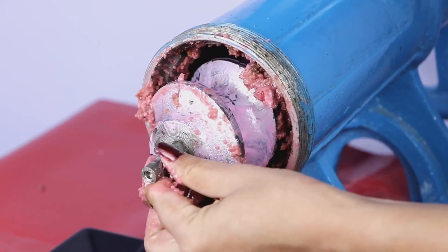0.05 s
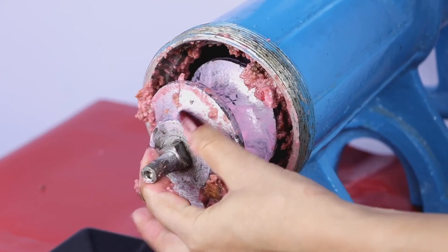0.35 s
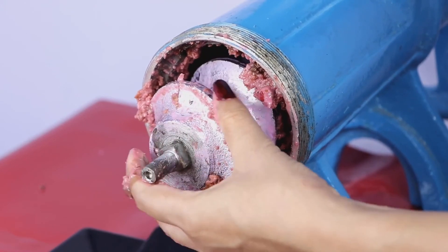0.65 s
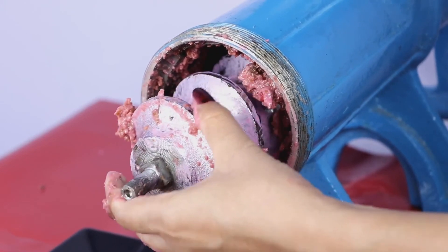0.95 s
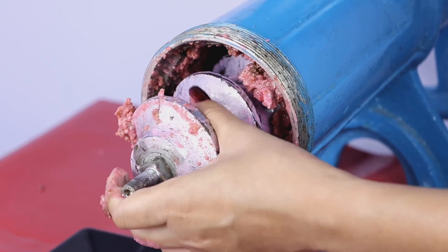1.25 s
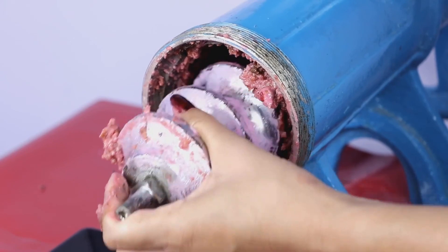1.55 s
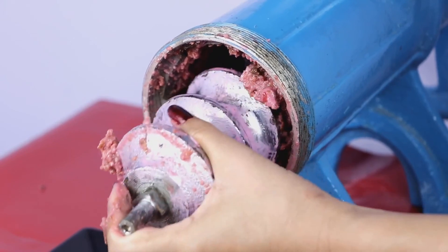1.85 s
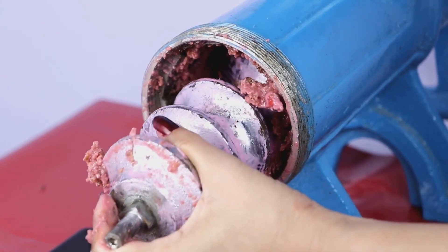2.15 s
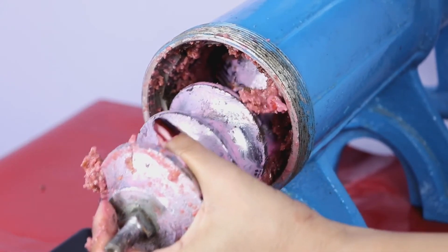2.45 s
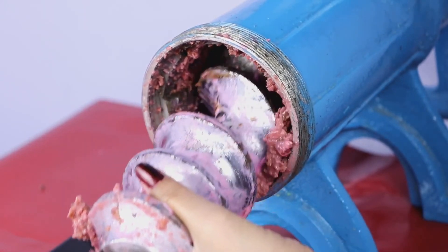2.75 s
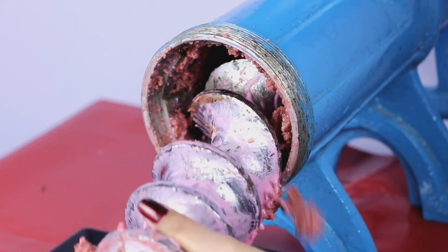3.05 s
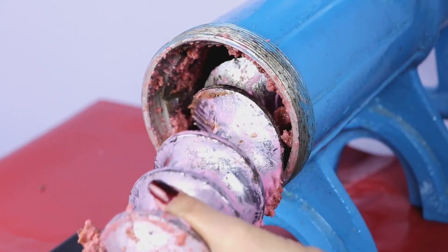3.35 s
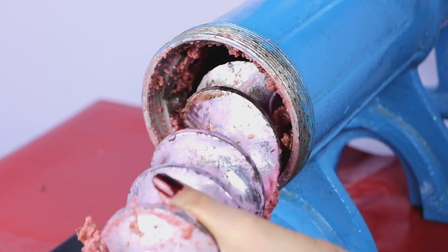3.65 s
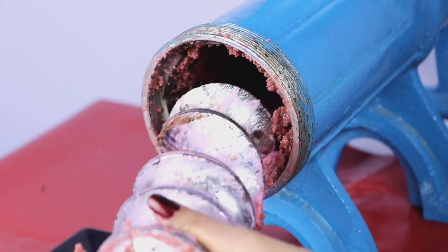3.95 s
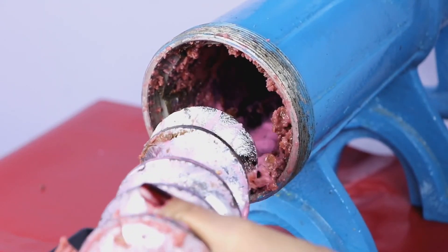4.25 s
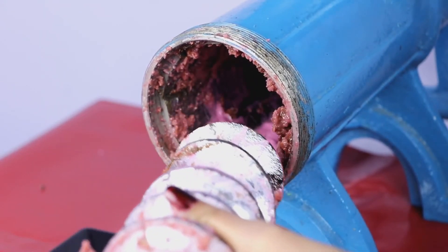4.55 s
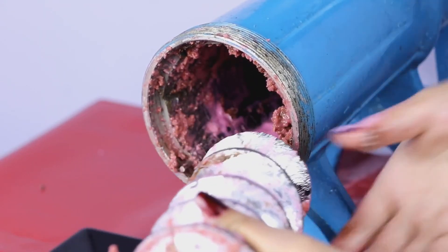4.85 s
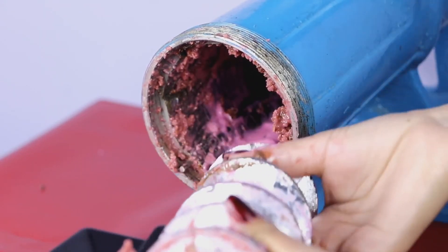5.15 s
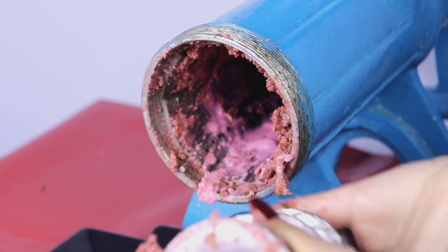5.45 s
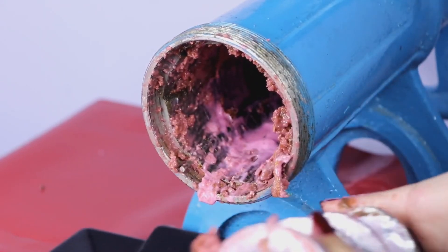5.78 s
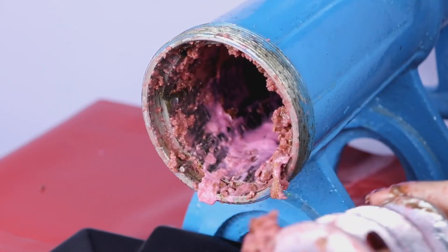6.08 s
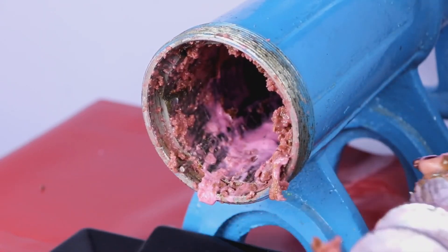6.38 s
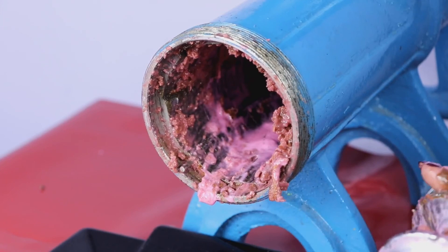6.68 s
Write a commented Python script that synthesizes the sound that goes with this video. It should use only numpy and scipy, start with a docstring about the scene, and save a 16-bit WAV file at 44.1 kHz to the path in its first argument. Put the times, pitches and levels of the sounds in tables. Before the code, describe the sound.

A steel auger is dragged by hand out of a big meat grinder in a series of short, juddering scrapes. It knocks against the cast barrel, which rings briefly, with the hardest clanks about halfway through and one more sharp clank later. Small squeaks and slight sticky crackles of meat come with the pulls. Faint wet ticks remain at the end. The grinder stands slightly right of a stereo microphone in a hard-walled room.

```python
"""Steel scrapes, judders and knocks: the auger of a big meat grinder is dragged from its barrel by hand.
The flights stick and slip along the bore in several pulls and strike it as the auger tips and drops off
the rim. Cast barrel and stand ring with every slip and knock; edges ping and squeak, sticky meat tears.
The place is a hard-walled room, with the grinder slightly to the right of a stereo microphone pair.
Faint wet ticks, low room noise and microphone hiss lie underneath."""
import sys
import numpy as np
from scipy import signal
from scipy.fft import rfft, irfft
from scipy.io import wavfile

SR = 44100
rng = np.random.default_rng(int(sys.argv[2]) if len(sys.argv) > 2 else 0)


def put_to_file(sound):
    """Save the sound as 16-bit audio at rate SR, in the file named by the first command-line argument."""
    columns = np.atleast_2d(sound).T  # one column per channel
    safe = np.clip(columns, -1, 1)
    whole_steps = np.round(safe * 32767)
    wavfile.write(sys.argv[1], SR, whole_steps.astype(np.int16))


N = 296352
TIME = np.arange(N) / SR
RING_TIME = TIME[:SR]


# pulls on the auger, with judder and grating relative to the grinding:
# start_s, rise_s, hold_s, release_s, grind_db, judder_db, grate_db
HAND_PULLS = [(0.0, 0.0013, 0.017, 0.026, -14, -12, -8), (0.727, 0.088, 0.062, 0.1, -16.5, -2.5, -9),
              (1.418, .11, 0.051, 0.13, -17.5, -2, -12), (1.907, 0.063, 0.057, 0.15, -19, -2.5, -9.5),
              (2.334, 0.17, 0.059, .2, -30.5, -2, -12), (2.661, 0.024, 0.018, 0.083, -24, -0.5, -8.5),
              (2.97, 0.035, 0.029, 0.13, -22.5, -12, -15.5), (3.479, .3, 0.086, .18, -21.5, -7, -14),
              (4.727, 0.045, 0.034, 0.15, -20.5, -21, -11.5), (4.962, 0.022, 0.043, 0.08, -35, -10, -6.5)]
def pull_gains():
    """Each pull breaks loose, swells with the hand's effort, holds and lets go: grind, judder, grate."""
    breakaway_db, ease_in_share = -10, 0.19
    gains = np.zeros((3, N)) + 1e-6
    for start, rise, hold, release, grind_db, judder_db, grate_db in HAND_PULLS:
        t = TIME - start
        effort = from_db(breakaway_db * np.clip(1 - t / rise, 0, 1))
        ease_in = np.clip(t / (ease_in_share * rise), 0, 1)
        letting_go = np.clip(1 - (t - rise - hold) / release, 0, 1) ** 1.07
        peaks = from_db([[grind_db], [grind_db + judder_db], [grind_db + grate_db]])
        gains += peaks * effort * ease_in * letting_go
    return gains


def slips(per_s, unevenness, rub_db):
    """Stick and slip: jerks at uneven intervals, sized by how long they stuck, over steady rubbing."""
    sticks = np.exp(unevenness * rng.standard_normal(N // 10))
    at = (np.cumsum(sticks / sticks.mean()) * SR / per_s).astype(int)
    jerks = np.zeros(N)
    jerks[at[at < N]] = np.sqrt(sticks[at < N])
    rubbing = from_db(rub_db) * rng.standard_normal(N)
    return rms_one(rms_one(jerks - jerks.mean()) + rubbing)


def scraping(grinder, judder_hz, grind_hz, grate_hz):
    """Slips of the whole auger, its flights and their edges each shake one register of the grinder."""
    force = slips(per_s=180, unevenness=.65, rub_db=-4.5)
    judder = cut(grinder, judder_hz, "low", order=6)
    grind = cut(cut(grinder, grind_hz, "low", order=3), 192, "high", order=3)
    grate = cut(cut(grinder, grate_hz, "low", order=3), 605, "high", order=4)
    registers = zip(pull_gains(), [grind, judder, grate])
    return sum(play(force * gain, energy_one(response)) for gain, response in registers)


# blows of the auger against the barrel: start_s, strength_db, hardness_hz
BLOWS = [(.002, -11.5, 1390), (.815, -11.5, 1900), (.849, -12, 2170), (1.468, -20, 1700),
         (1.560, -14.5, 2100), (1.891, -27, 1490), (1.925, -25, 2630), (1.992, -14.5, 1960),
         (2.1254, -8.5, 1220), (2.349, -17, 790), (2.492, -28, 2350), (2.621, -21, 890), (2.875, 1, 1110),
         (2.941, 3, 1450), (3.574, -25.5, 1390), (3.639, -21.5, 1970), (3.685, -23, 1410),
         (3.734, -15, 1800), (3.7675, -7, 1450), (3.833, -15, 2070), (3.902, -20.5, 1910),
         (3.939, -25, 2280), (4.7236, 0, 2600)]
def knocks(grinder, level_db, crack_db):
    """Each blow is a short push, the shorter the harder the contact, with a crack of crushed grit."""
    pushes, cracks = np.zeros(N), np.zeros(N)
    for start, db, hardness_hz in BLOWS:
        blow = np.zeros(N)
        blow[round(start * SR)] = from_db(db)
        pushes += cut(blow, hardness_hz, "low", order=4)
        cracks += blow * (hardness_hz / 2000) ** 2   # hard contacts crack, soft ones only clunk
    pushes = cut(pushes, 106, "high", order=1)   # a blow on the rim hardly rocks the stand
    crack_decay = dying(t60=0.0039) + from_db(-3.5) * dying(t60=0.15)
    burst = colour(rng.standard_normal(N), GRIT_SPECTRUM)[:SR] * crack_decay
    return from_db(level_db) * play(pushes, grinder) + from_db(crack_db) * play(cracks, [burst, burst])


# quickly damped clack of the auger, packed in meat: pitch_hz, level_db, t60_s
AUGER_MODES = [(410, -11, .035), (610, -4, .022), (800, -5, .016), (1020, 1, .018), (1290, 6, .02),
               (1620, 0, .011), (2000, 1, .012), (2300, -6, .009), (3400, -9, .006)]
# long ring of barrel and stand, before meat and hand damp it: pitch_hz, level_db, t60_s
BARREL_MODES = [(88, -6, .25), (102, -3, .52), (157, -7, .42), (173, -6, .5), (208, -12, .4), (252, -9, .5),
                (268, -13, .35), (310, -2, .55), (324, -4, .42), (389, -3, .42), (404, -2, .48),
                (468, -11, .35), (495, 0, .55), (551, -2, .48), (572, -4, .4), (604, -6, .4),
                (630, -10, .3), (706, -13, .3), (754, -12, .3), (824, -2, .4), (953, -5, .36),
                (995, -7, .3), (1031, -1, .42), (1093, -3, .38), (1190, -4, .3), (1258, -1, .45),
                (1322, -3, .42), (1565, -9, .35), (1900, -14, .25), (2067, -13, .3)]
def grinder_response(room, barrel_db, room_db, apart_hz):
    """One tap as it reaches the microphones: the auger's clack, the barrel's ring, the walls' answer."""
    # heavy castings take a moment to ring up, the barrel longer than the auger
    auger_rise, barrel_rise = 1 - np.exp(-RING_TIME / [[.0008], [.002]])
    opposed = np.pi / 2 + np.pi * np.arange(len(AUGER_MODES))   # neighbouring modes start in antiphase
    clack = cut(ring(AUGER_MODES, opposed) * auger_rise, 140, "high", order=1)
    # the higher a barrel mode, the more its phase differs between the two microphones
    barrel_hz = np.array(BARREL_MODES)[:, 0]
    apart = np.minimum(barrel_hz / apart_hz, 1) * rng.choice([-1, 1], len(barrel_hz))
    phases = rng.uniform(0, 2 * np.pi, len(barrel_hz))
    barrel = np.array([ring(BARREL_MODES, phases + apart), ring(BARREL_MODES, phases - apart)])
    barrel = cut(barrel * barrel_rise, 34, "high")
    barrel *= dying(t60=3.7)   # meat in the bore and the hand damp the ring a little
    return clack + from_db(barrel_db) * barrel + from_db(room_db) * play(clack, room)[:, :SR]


# thin ring of a flight's edge: pitch_hz, level_db, t60_s
EDGE_MODES = [(3034, -0.5, 0.079), (3950, -3, 0.064), (4595, -5.5, 0.17), (5540, -3.5, 0.1)]
def edge_pings(level_db, growth):
    """Hard contacts set a flight's edge pinging; the ping gains `growth` dB for each dB of the blow."""
    taps = np.zeros(N)
    for start, db, hardness_hz in BLOWS:
        taps[round(start * SR)] = from_db(level_db + growth * db) * (hardness_hz / 2000) ** 1.66
    edge = [ring(EDGE_MODES, rng.uniform(0, 2 * np.pi, len(EDGE_MODES))) for _ in range(2)]
    return play(taps, edge)


# spectrum of crushed grit: frequency_hz, level_db
GRIT_SPECTRUM = [(2300, 7), (2800, 6), (3800, -1.5), (5500, -9), (8000, -9.5), (11000, -19), (15500, -29)]
def grit(room, level_db, room_db):
    """Fine crackle of rough metal, coming in little catches and growing with the edges' grating."""
    _, _, grating = pull_gains()
    catches = rms_one(np.abs(cut(rng.standard_normal(N), 35, "low")) + 0.54)
    grains = colour(random_clicks(per_s=2500, spread_db=7) * catches, GRIT_SPECTRUM)
    return in_room(grains * from_db(level_db) * grating, room, room_db)


# edges catching in the bore: peak_s, length_s, level_db, pitch_hz
EDGE_CATCHES = [(1.525, .015, -52, 5500), (1.995, .03, -55, 5400), (2.705, .05, -49, 2060),
                (3.04, .1, -33, 1300), (3.15, .12, -40, 1290), (3.165, .012, -56, 4200),
                (3.191, .012, -57, 4150), (3.943, .015, -43, 2080), (4.89, .015, -51, 2550),
                (5.068, .02, -49, 2020)]
def squeaks():
    """A catching edge sings for a moment in a narrow band."""
    return swells(EDGE_CATCHES, rng.standard_normal(N), width=0.05)


# meat coming off the metal: peak_s, length_s, level_db, centre_hz
MEAT_TEARS = [(.862, 0.018, -45, 7800), (1.516, 0.033, -54, 9050), (1.573, 0.022, -50.5, 8600),
              (1.928, 0.0095, -49, 7900), (2.024, 0.065, -56, 8600), (2.19, 0.018, -52, 7500),
              (2.764, 0.035, -51.5, 5800), (3.073, 0.014, -57, 6000), (3.17, 0.041, -56, 7350),
              (3.84, 0.022, -54, 6800)]
def squelches():
    """Sticky meat tears away with a broad, high crackle."""
    return swells(MEAT_TEARS, random_clicks(per_s=2500, spread_db=4), width=.45)


# spells of small wet ticks: start_s, end_s
WET_SPELLS = [(0.159, .7), (3.32, 4), (5.33, 6.3)]
def wet_ticks(level_db, stray_db, band_hz, t60):
    """Small, blurred ticks come in spells at a loose pace, with fainter strays at random throughout."""
    per_s, jitter, spread_db = 13, .55, 1.7
    noise = stereo_noise(ROOM_CORRELATION)[:, :SR]
    blur = energy_one(cut(noise, band_hz, "band", order=3) * dying(t60))
    clicks = from_db(stray_db) * random_clicks(per_s=14, spread_db=3)
    for at_s, end_s in WET_SPELLS:
        while at_s < end_s:
            size, wait = rng.standard_normal(2)
            clicks[round(at_s * SR)] += from_db(spread_db * size)
            at_s += np.exp(jitter * wait) / per_s
    return from_db(level_db) * play(clicks, blur)


# decay between the hard walls: frequency_hz, t60_s
ROOM_DECAY = [(200, 0.76), (600, 0.37), (1500, 0.4), (4000, 0.42), (12000, 0.31)]
# how alike the reflections are at the two microphones: frequency_hz, correlation
ROOM_CORRELATION = [(150, 0.93), (400, 1), (800, 0.59), (1500, 0.18), (3000, 0.028), (12000, 0.79)]
def room_response(build_s):
    """Reflections from the walls merge into a diffuse tail; the bass octaves linger longest."""
    noise = stereo_noise(ROOM_CORRELATION)[:, :SR]
    tail = np.zeros((2, SR))
    for hz in 125 * 2. ** np.arange(8):
        octave = cut(noise, [hz / np.sqrt(2), hz * np.sqrt(2)], "band")
        tail += octave * dying(at_hz(ROOM_DECAY, hz))
    return energy_one(tail * (1 - np.exp(-RING_TIME / build_s)))


# spectrum of the room's own noise: frequency_hz, level_db
ROOM_TONE_SPECTRUM = [(25, -39), (50, 2), (80, -10), (125, -6), (160, -1.5), (300, -1.5), (490, -5),
                      (620, -8), (1250, -13.5), (1600, -15.5), (2200, -22.5), (3300, -26.5), (5000, -38)]
# how alike it is at the two microphones: frequency_hz, correlation
ROOM_TONE_CORRELATION = [(30, 0.68), (120, 0.94), (500, 0.8), (1500, 0.078), (4000, 0.18)]
def room_tone(level_db):
    """Steady low noise fills the room around the microphones."""
    return from_db(level_db) * colour(stereo_noise(ROOM_TONE_CORRELATION), ROOM_TONE_SPECTRUM)


# spectrum of the microphones' own noise: frequency_hz, level_db
HISS_SPECTRUM = [(2500, -15), (5000, -11), (6500, -7), (7500, -4), (9500, -5), (12000, -8.5), (15500, -24)]
# how alike it is in the two channels: frequency_hz, correlation
HISS_CORRELATION = [(3000, 0.2), (7000, 0.91), (15000, .98)]
def microphone_hiss(level_db):
    """The microphones add a faint, steady hiss."""
    return from_db(level_db) * colour(stereo_noise(HISS_CORRELATION), HISS_SPECTRUM)


def from_db(db):
    """Decibels to gain."""
    return 10 ** (np.asarray(db) / 20)


def rms_one(x):
    """Scale to rms 1."""
    return x / np.sqrt(np.mean(x ** 2) + 1e-20)


def energy_one(response):
    """Scale a stereo response so that it passes white noise at unchanged power."""
    return response / np.sqrt(np.sum(response ** 2) / 2)


def at_hz(points, hz):
    """Read (frequency_hz, value) points on a log-frequency axis."""
    freqs, values = np.transpose(points)
    return np.interp(np.log(np.maximum(hz, 1)), np.log(freqs), values)


def cut(x, hz, kind, order=2):
    """Butterworth filter."""
    corners_hz = np.minimum(hz, SR / 2 - 100)
    return signal.sosfilt(signal.butter(order, corners_hz, kind, fs=SR, output="sos"), x + 1e-18)


def colour(x, spectrum):
    """Give a steady noise a spectrum; rms 1."""
    gains = from_db(at_hz(spectrum, np.fft.rfftfreq(N, 1 / SR)))
    return rms_one(irfft(rfft(x) * gains, N))


def stereo_noise(correlation):
    """White noise whose two channels are as alike as the table says."""
    mid, side = rfft(rng.standard_normal((2, N)))
    alike = np.clip(at_hz(correlation, np.fft.rfftfreq(N, 1 / SR)), -1, 1)
    return irfft(np.sqrt((1 + alike) / 2) * mid + np.sqrt((1 - alike) / 2) * side * [[1], [-1]], N)


def play(force, response):
    """Pass a force through a stereo response."""
    return signal.fftconvolve(np.atleast_2d(force), response, axes=1)[:, :N]


def in_room(direct, room, room_db):
    """The direct sound plus its reflections from the walls."""
    return direct + from_db(room_db) * play(direct, room)


def dying(t60):
    """Exponential decay, 60 dB down after t60 seconds."""
    return np.exp(-np.log(1000) * RING_TIME / t60)


def ring(modes, phases):
    """Sum of decaying sines."""
    return sum(from_db(db) * dying(t60) * np.sin(2 * np.pi * hz * RING_TIME + phase)
               for (hz, db, t60), phase in zip(modes, phases))


def random_clicks(per_s, spread_db):
    """Clicks at random moments, of uneven size and sign."""
    hits = rng.random(N) < per_s / SR
    sizes = from_db(spread_db * np.clip(rng.standard_normal(N), -2, 2))
    return hits * sizes * rng.choice([-1, 1], N)


def swells(rows, source, width):
    """Short bell-shaped swells of a source, each in a band round its own pitch."""
    out = np.zeros(N)
    for peak_s, length_s, db, hz in rows:
        near = np.abs(TIME - peak_s) < .15
        band = rms_one(cut(source[near], [hz / (1 + width), hz * (1 + width)], "band"))
        out[near] += from_db(db) * band * np.exp(-(2 * (TIME[near] - peak_s) / length_s) ** 2)
    return out


def scene():
    """Grinder and room, both a little louder in the right microphone, over an even hiss."""
    room = room_response(build_s=0.00033)
    grinder = grinder_response(room, barrel_db=-15.5, room_db=4.5, apart_hz=1970)
    metal = scraping(grinder, judder_hz=227, grind_hz=540, grate_hz=2570)
    metal += knocks(grinder, level_db=-6.5, crack_db=-31.5)
    metal[0] = np.pad(metal[0], (1, 0))[:N]   # the left microphone hears it one sample later
    details = grit(room, level_db=-17, room_db=4.5)
    details += in_room(squeaks() + squelches(), room, room_db=-0.5)
    details += edge_pings(level_db=-40.5, growth=0.44)
    ticks = wet_ticks(level_db=-26, stray_db=-7.5, band_hz=[1900, 3650], t60=0.063)
    at_microphones = metal + details + ticks + room_tone(level_db=-45.5)
    lean_right = from_db([[-0.7], [0.7]])
    return at_microphones * lean_right + microphone_hiss(level_db=-62.5)


def record(dry):
    """The hardest knocks overload the microphone input; a steep filter cuts the top."""
    ceiling, cutoff_hz = .92, 15800
    clipped = np.clip(dry, -ceiling, ceiling)
    return signal.sosfilt(signal.ellip(10, .1, 90, cutoff_hz, fs=SR, output="sos"), clipped)


dry = scene()
out = record(dry)
put_to_file(out)
```